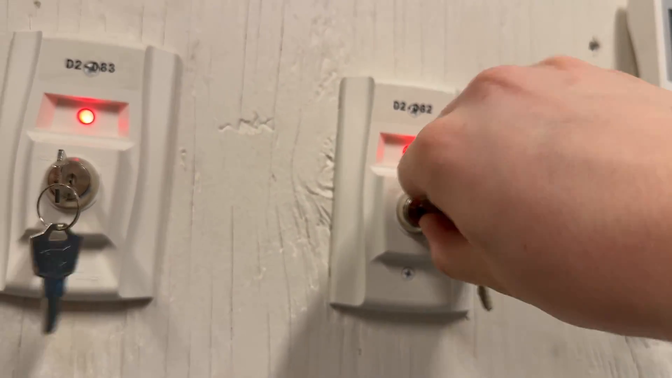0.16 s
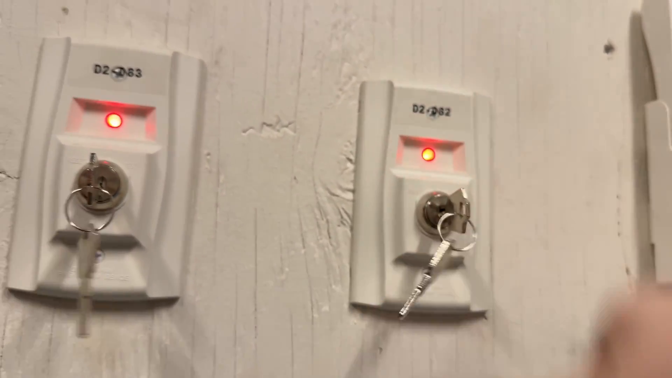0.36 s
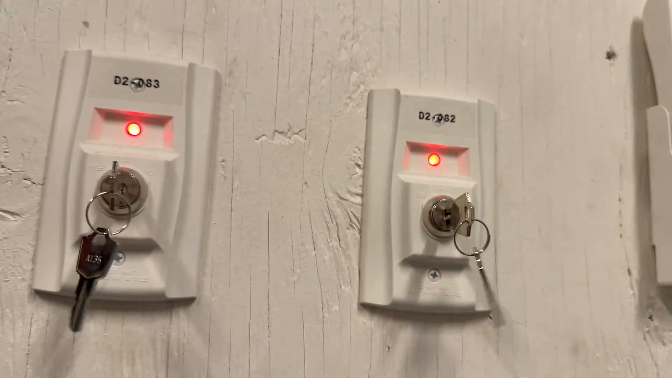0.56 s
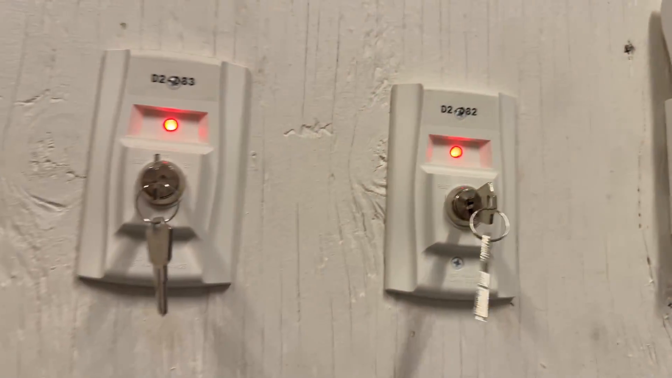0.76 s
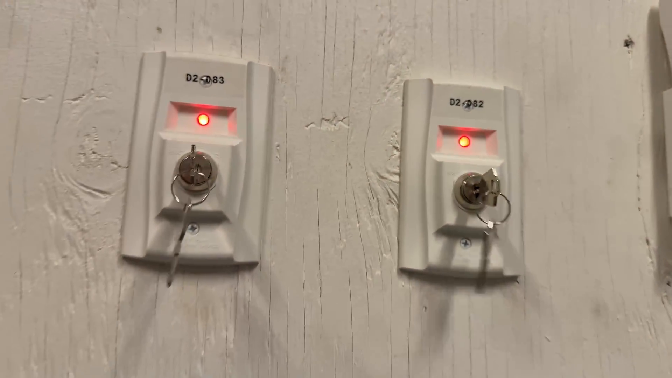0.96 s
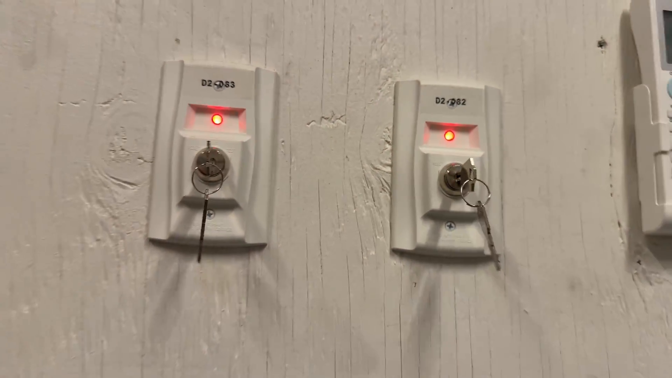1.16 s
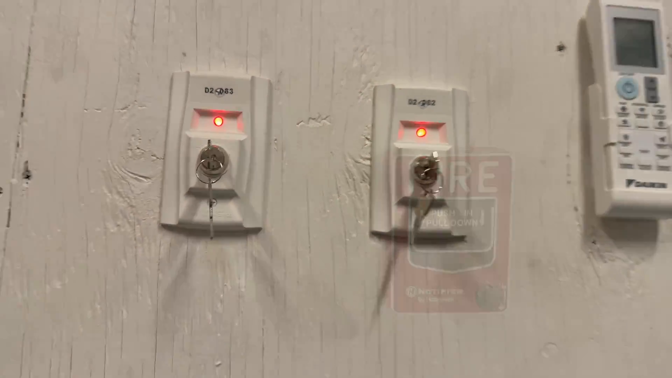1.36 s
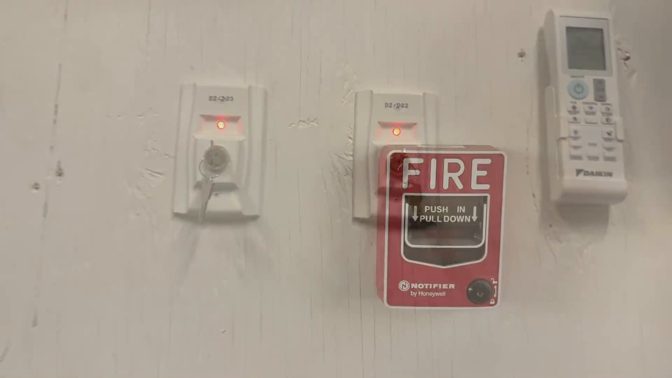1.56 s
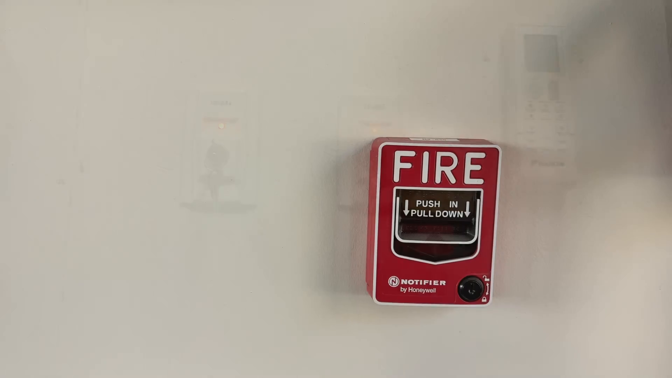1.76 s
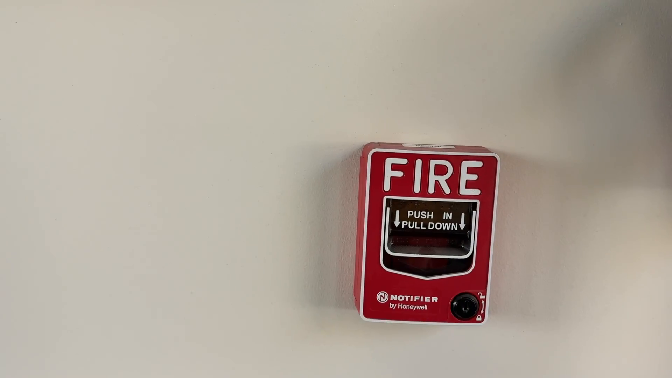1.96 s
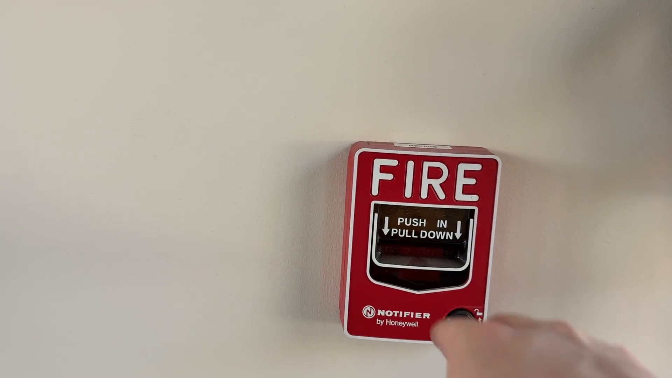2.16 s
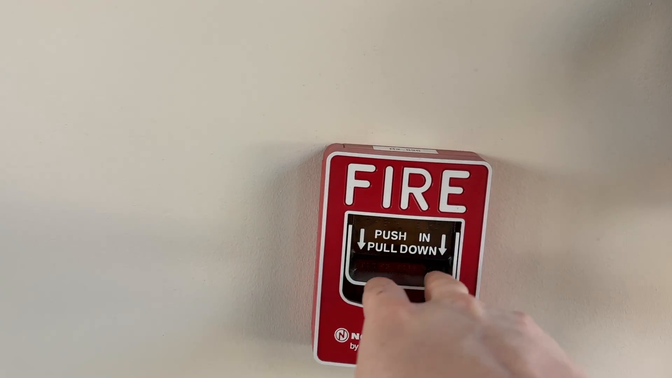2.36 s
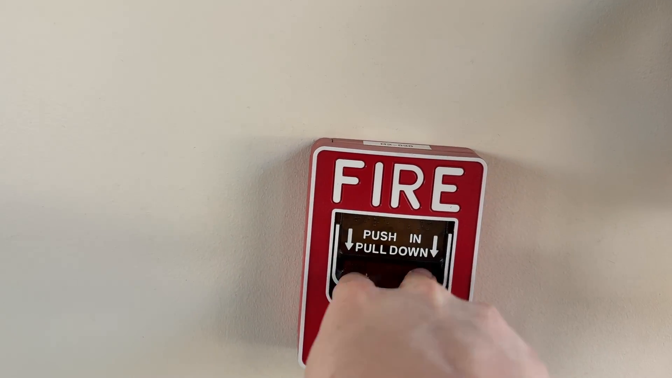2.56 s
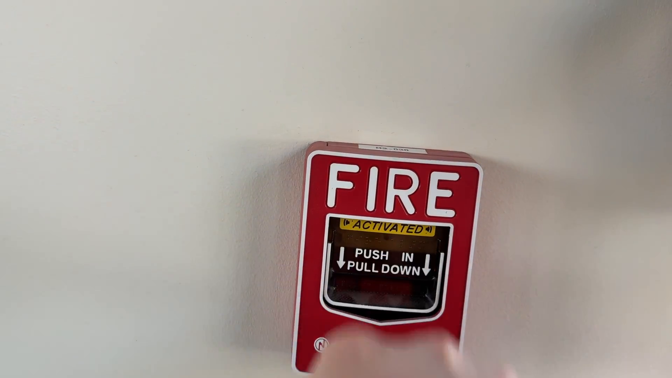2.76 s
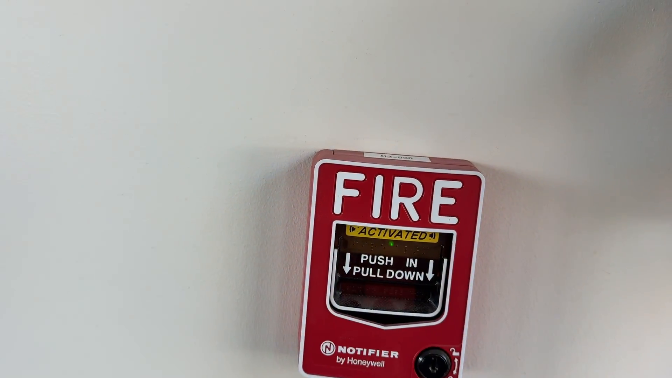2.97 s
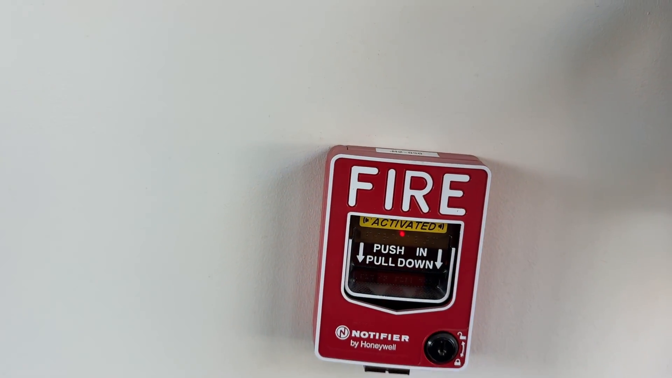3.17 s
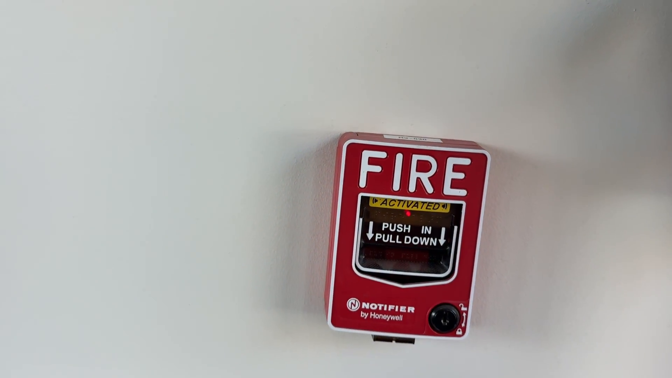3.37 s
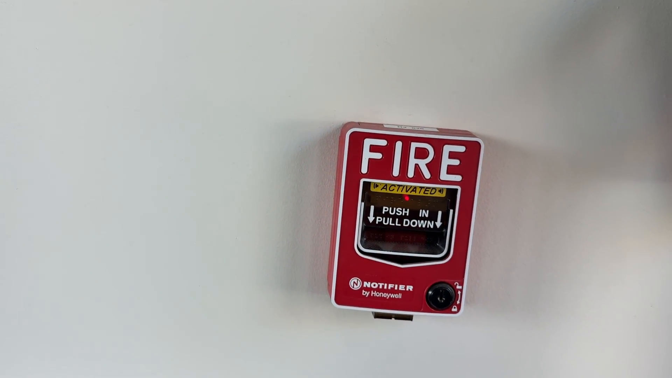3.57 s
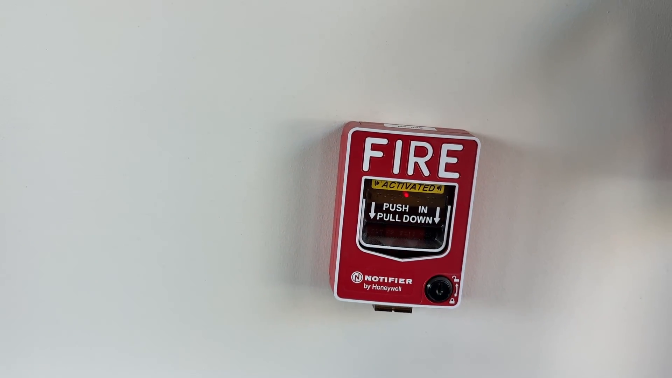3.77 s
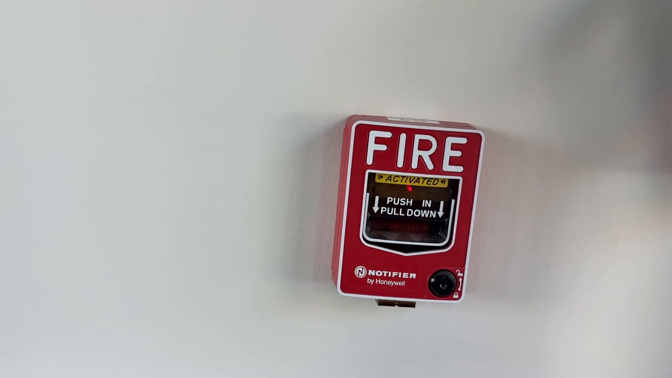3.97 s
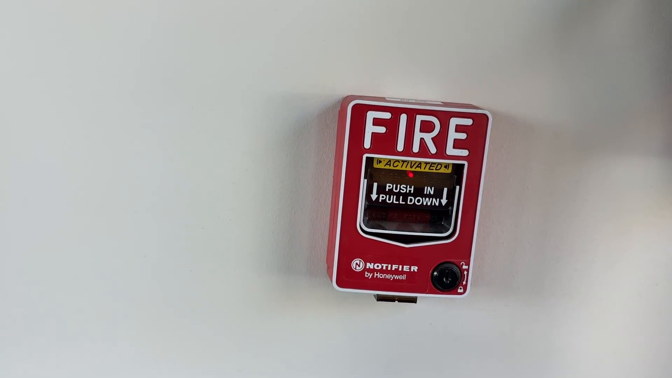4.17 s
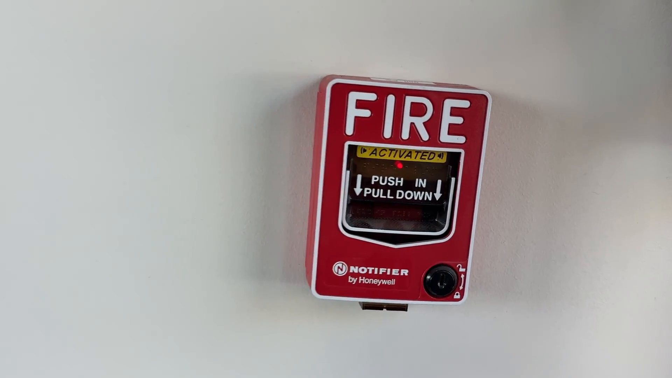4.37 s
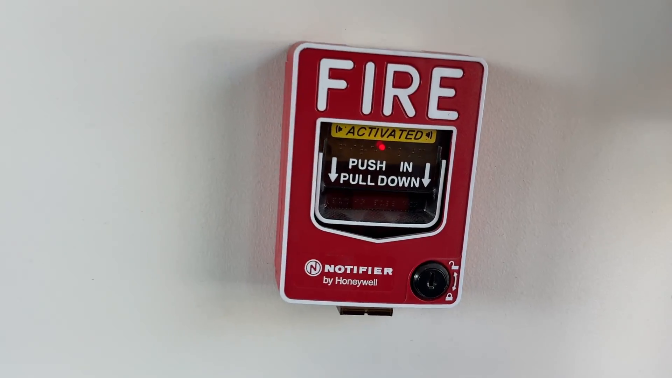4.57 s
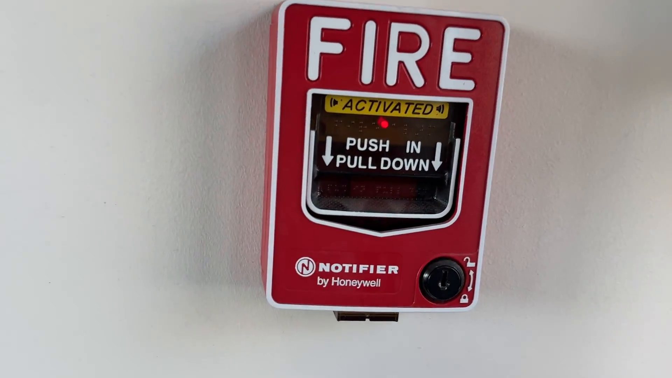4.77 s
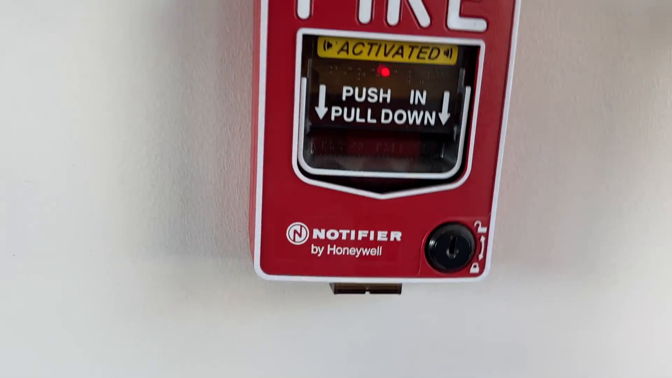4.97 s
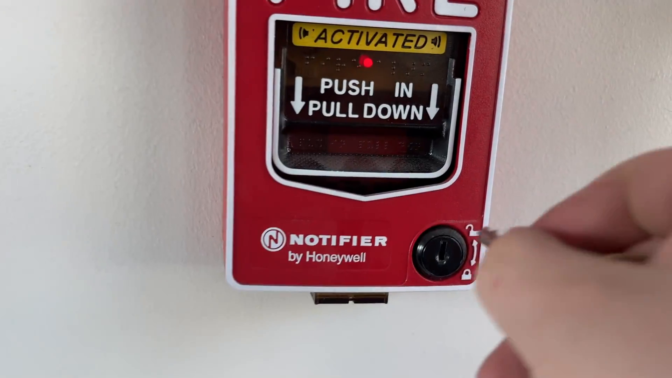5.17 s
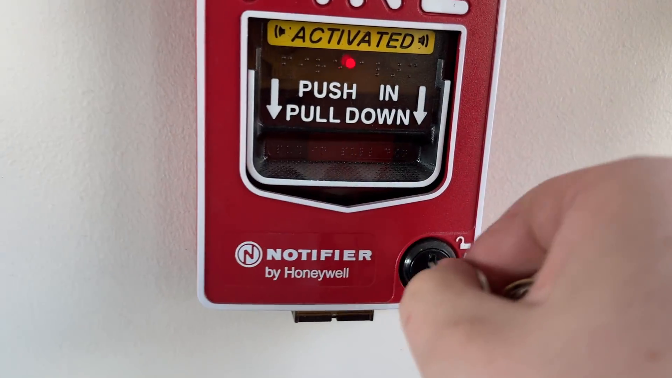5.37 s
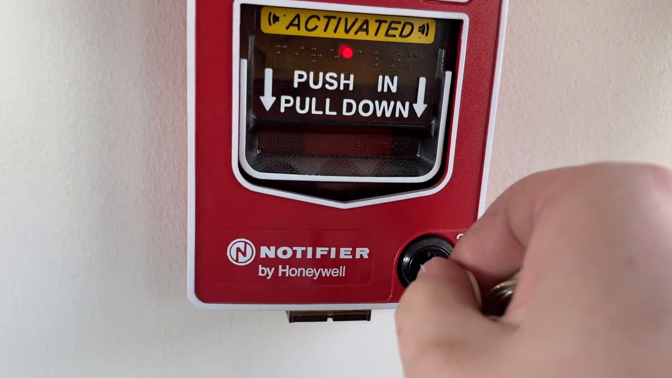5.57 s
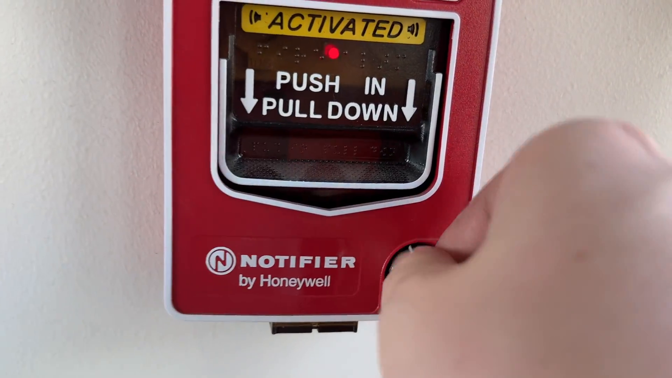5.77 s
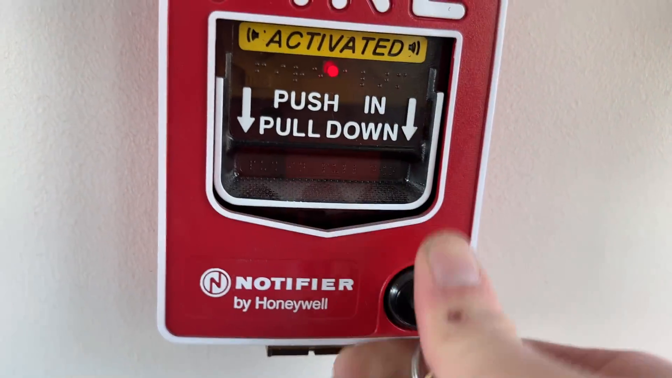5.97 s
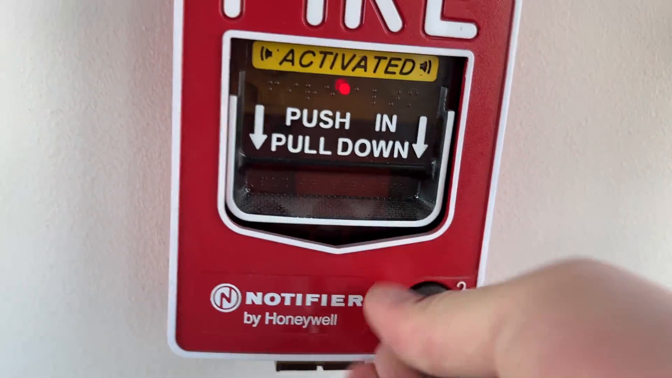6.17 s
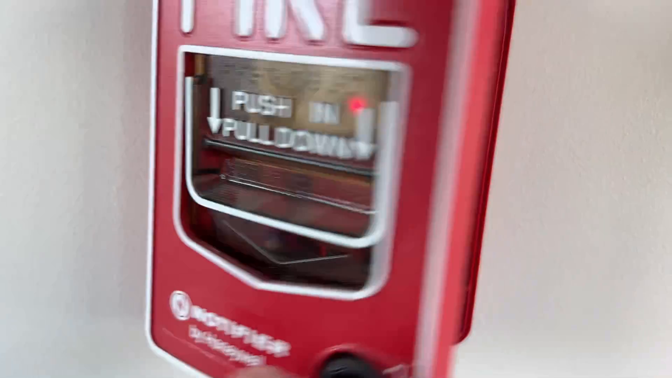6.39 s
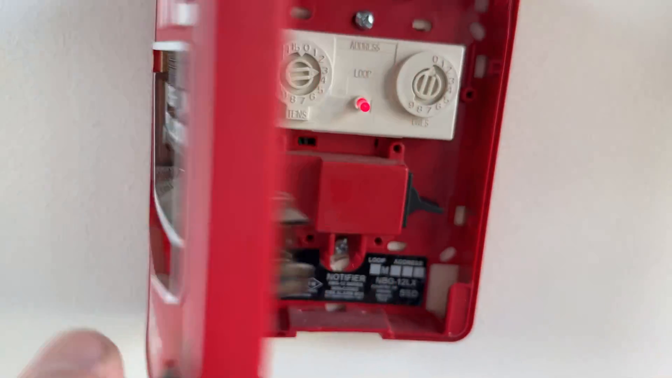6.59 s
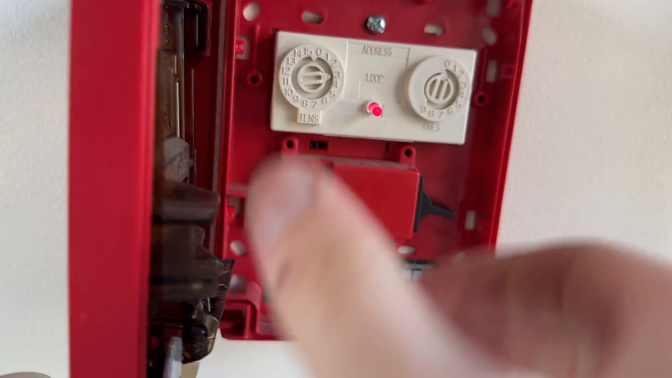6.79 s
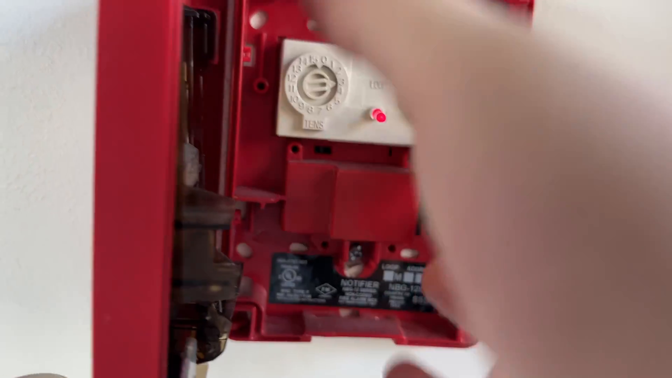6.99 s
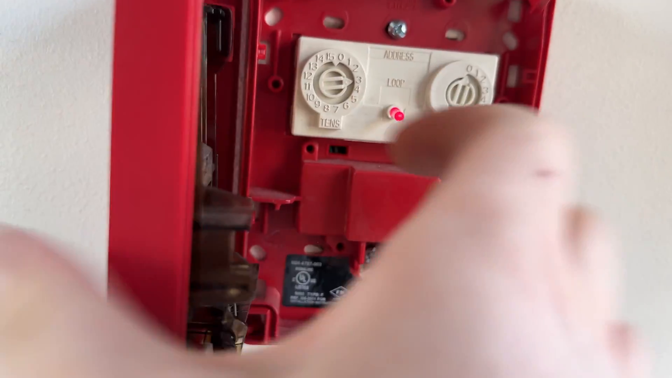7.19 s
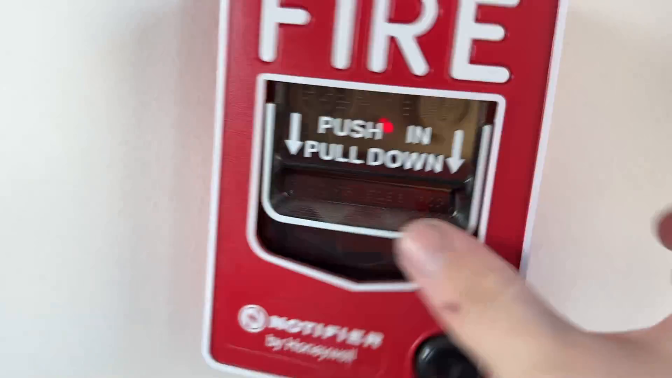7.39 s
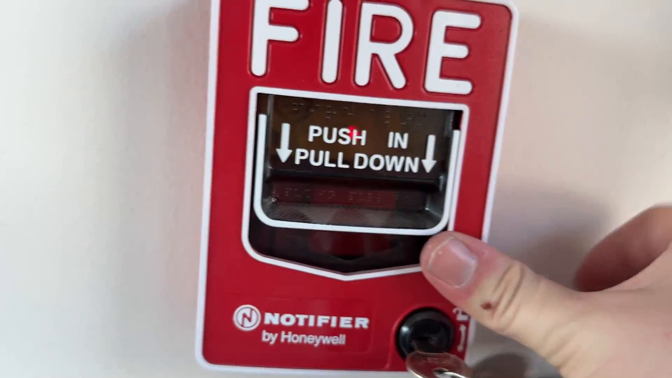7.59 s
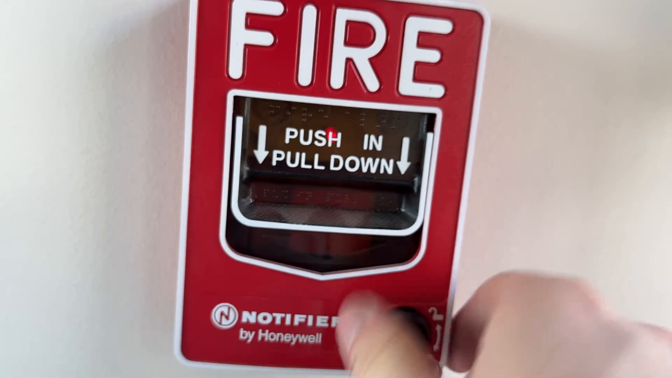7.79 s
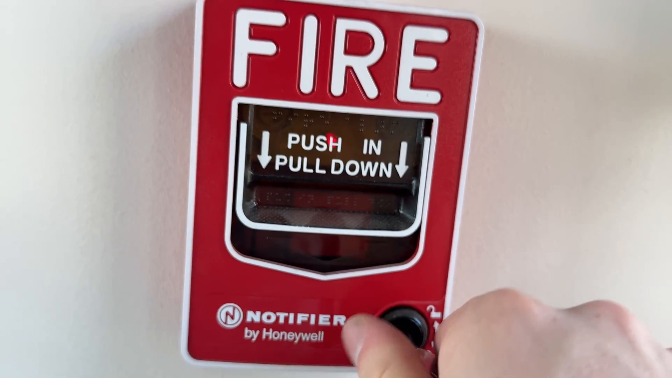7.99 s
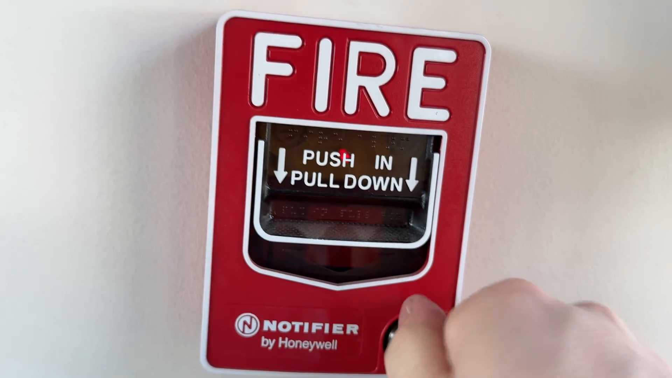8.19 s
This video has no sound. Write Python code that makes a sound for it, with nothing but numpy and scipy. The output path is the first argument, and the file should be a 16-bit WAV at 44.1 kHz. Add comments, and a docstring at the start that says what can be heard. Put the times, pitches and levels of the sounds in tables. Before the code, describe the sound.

A key clicks lightly in a wall switch in a humming room. The hum fades into a quieter, echoing hall, where an alarm box handle is pulled down with a sharp clack. A key ring jangles, the lock clicks, and the plastic box scrapes open and knocks shut again, with dull thumps from the wall behind it. The microphone is close, and a reverberant tail follows each contact.

```python
"""A key clicks round in a wall switch in a humming room. Then, in a live hall, an alarm box handle is
pulled down with a clack, a key ring jangles, and the plastic box is unlocked, swung open and shut again.
Blows crack and ring the case and thump the wall behind it; the keys tick and ring as they collide.
A two-port phone microphone is held close, with the hall's tail behind each contact."""
import sys
import numpy as np
from scipy import signal
from scipy.fft import rfft, irfft, next_fast_len
from scipy.io import wavfile
from scipy.ndimage import uniform_filter1d

SR = 44100
rng = np.random.default_rng(int(sys.argv[2]) if len(sys.argv) > 2 else 0)


def to_wav(s):
    """Save 16-bit WAV."""
    ch = np.atleast_2d(s).T  # columns
    pcm = np.round(np.clip(ch, -1, 1) * 32767)  # PCM
    wavfile.write(sys.argv[1], SR, pcm.astype(np.int16))


N = 363384
FFT = next_fast_len(N + 2 * SR)

# knocks on the plastic: (time [s], level [dB], favoured pitch [Hz], decay [ms])
PLASTIC_KNOCKS = [(0.2581, -25, 1840, 4.16), (1.911, -60.5, 2280, 35), (2.449, -36.5, 2370, 7.1),
                  (2.643, -7.5, 1560, 2), (2.649, -3, 1487, 2.37), (4.974, -9.5, 1850, 3.2),
                  (5.151, -16, 2180, 1.55), (5.179, -17, 2100, 2.5), (5.384, -24.5, 1890, 12.5),
                  (5.447, -27, 1520, 18), (5.616, -15.5, 1090, 8), (5.624, -7.5, 960, 7.2),
                  (5.676, -14, 990, 21.7), (5.708, -3, 920, 2.46), (5.826, -17, 890, 4.4),
                  (6.05, -19, 860, 10.5), (6.07, -17, 704, 5.4), (6.3, -24.5, 1290, 9.1),
                  (6.342, -10.5, 1280, 4.6), (6.357, -12, 1390, 9.2), (6.409, -5.5, 1810, 2.45),
                  (6.416, -11.5, 1630, 6.7), (7.382, -15, 1770, 7.1), (7.417, -17, 1570, 3.7),
                  (7.456, -20, 1424, 9.9), (7.477, -14.5, 1306, 11.4), (7.501, -17.5, 1394, 9.3),
                  (7.522, -23, 1330, 4.3), (8.104, -21, 1510, 3.5), (8.113, -8.5, 1410, 3.37),
                  (8.121, -14, 395, 5.5)]


def undb(db):
    """Decibels to amplitude."""
    return 10 ** (np.asarray(db) / 20)


def level(x, db):
    """Set the rms level."""
    return x * undb(db) / np.sqrt(np.mean(x ** 2))


def along(points):
    """Table values on the FFT bins, joined on a log-frequency axis."""
    hz, value = np.transpose(points)
    return np.interp(np.log(np.arange(FFT // 2 + 1) * SR / FFT + 1), np.log(hz), value)


def colour(x, points):
    """Filter by (frequency [Hz], gain [dB]) points; white noise keeps its power."""
    gain = undb(along(points))
    return irfft(rfft(x, FFT) * gain / np.sqrt(np.mean(gain ** 2)), FFT)[..., :N]


def walk(rate):
    """Glide to a new random value `rate` times a second; spread near 1."""
    step = int(SR / rate)
    return 1.2 * uniform_filter1d(np.repeat(rng.standard_normal(N // step + 1), step), step)[:N]


def grit(rate, depth_db):
    """Noise broken into uneven grains."""
    return rng.standard_normal(N) * undb(depth_db * walk(rate))


def clicks(rate, spread_db):
    """Dense chance clicks of unit power, a few stronger than the rest."""
    when, size, sign = rng.random(N) < rate / SR, rng.exponential(size=N), rng.standard_normal(N)
    return level(when * sign * undb(spread_db * size), 0)


def swells(start, hold, peak_db, rise_db_s, fall_db_s):
    """Gain that swells to each peak, holds and dies away; overlapping swells add."""
    t = np.arange(N) / SR
    rows = zip(*np.broadcast_arrays(start, hold, peak_db, rise_db_s, fall_db_s))
    return sum(undb(db - up * np.maximum(at - t, 0) - down * np.maximum(t - at - held, 0))
               for at, held, db, up, down in rows)


def bursts(rows, levels_db, rise_s, rough, blunt=False):
    """Each contact is a swelling, then fading patch of rough force; blunt makes it one tap."""
    force, t = np.zeros(N + SR), np.arange(SR // 10) / SR
    rough = np.pad(rough, (0, SR), "wrap")
    for (at, *_, decay_ms), db in zip(rows, levels_db):
        span = slice(int(at * SR), int(at * SR) + len(t))
        shape = (1 - np.exp(-t / rise_s)) ** 2 * np.exp(-t / (max(decay_ms, 1) / 1000))
        patch = 1. * (shape == shape.max()) if blunt else shape * rough[span]
        force[span] += undb(db) * patch * np.sqrt(np.sum(shape ** 2) / np.sum(patch ** 2))
    return force[:N]


def ring(force, modes, vary_db, vary_pitch):
    """Decaying modes whose strength and pitch wander as the grip shifts."""
    out = 0
    for hz, db, t60 in modes:
        turn = np.exp(2j * np.pi * np.cumsum(hz * (1 + vary_pitch * walk(12))) / SR)
        drive = force * undb(db + vary_db * walk(25))
        pole = np.exp(-np.log(1000) / (t60 * SR))
        out = out + (turn * signal.lfilter([1], [1, -pole], drive / turn)).imag
    return out


def air(spectrum, db, flicker_db):
    """Room tone, alike left and right in the bass and wide above it."""
    mid, side = (colour(rng.standard_normal(N), spectrum) for _ in range(2))
    side = colour(side, [(100, -25), (400, -6), (1000, 0)])
    pair = level(mid, db) + undb(db + 1.5) * side * np.array([[1], [-1]])
    return pair * undb(flicker_db * walk(2.6))


def background():
    """Plant noise and mains hum in the first room fade into the quieter air of the hall."""
    # room tone of each place: (frequency [Hz], relative density [dB])
    plant_spectrum = [(15, -68), (25, -42), (43, -4.5), (118, -9.5), (207, -5.5), (1030, -20), (15000, -60)]
    hall_spectrum = [(15, -23), (25, -29.5), (54, 0), (231, -23), (1000, -31), (1250, -30.5),
                     (15000, -62.5)]
    # hum tones: (frequency [Hz], rms level [dB])
    hum_tones = [(119.5, -52.5), (1024, -65.5)]
    t = np.arange(N) / SR
    in_hall = np.interp(t, (1.36, 1.83), (0, 1))
    hum = sum(undb(db + 2 * walk(6)) * np.sqrt(2) * np.sin(2 * np.pi * hz * t) for hz, db in hum_tones)
    room = air(plant_spectrum, db=-49, flicker_db=0.43) + hum
    return (1 - in_hall) * room + in_hall * air(hall_spectrum, db=-51, flicker_db=0.34)


def hall(x):
    """Diffuse tail of the hall, each half-octave band dying at its own rate."""
    # reverberation time: (frequency [Hz], t60 [s])
    decay_times = [(60, 1.6), (1900, 1.267), (3000, 0.91), (6000, 0.92), (16000, 0.1)]
    # tone of the tail: (frequency [Hz], relative gain [dB])
    tail_tone = [(60, 3.5), (330, 10.5), (700, 5.5), (1800, 5), (2600, 0.5), (16000, -4)]
    # width of the tail at the microphone: (frequency [Hz], side over mid [ratio])
    width = [(80, .03), (150, .2), (300, .6), (1000, 1.4), (5000, 1.4), (9000, .3)]
    decay_hz, decay_s = np.transpose(decay_times)
    t, tail = np.arange(2 * SR) / SR, 0
    octaves = np.log2(np.arange(FFT // 2 + 1) * SR / FFT + 1)
    for hz in 45 * 2 ** np.arange(0, 9, .5):
        t60 = np.interp(np.log(hz), np.log(decay_hz), decay_s)
        envelope = np.exp(-np.log(1000) * t / t60) * np.minimum(t / 0.007, 1)
        mid, side = rfft(rng.standard_normal((2, len(t))) * envelope, FFT)
        pair = mid + along(width) * side * np.array([[1], [-1]])
        band = np.sqrt(np.clip(1 - 2 * abs(octaves - np.log2(hz)), 0, 1))
        tail = tail + pair * band
    return irfft(rfft(x, FFT) * tail * undb(along(tail_tone) - 35), FFT)[:, :N]


def rasp_and_push():
    """Two gain curves: rough swells of sound rising after the knocks, and the hand's push on the wall."""
    # swells: (time at full strength [s], hold [s], rasp [dB], push [dB])
    peaks = [(2.663, 0.031, -43, -38), (5.44, 0.022, -51, -33.5), (5.673, 0.022, -40, -26),
             (5.708, 0.031, -52, -23), (6.059, 0.014, -38.5, -32), (6.37, .02, -37.5, -35),
             (6.586, 0.059, -31, -41), (7.516, 0.21, -31.5, -37.5), (7.902, 0.32, -47, -52)]
    at, hold, rasp_db, push_db = np.transpose(peaks)
    rasp = swells(at, hold, rasp_db, rise_db_s=131, fall_db_s=102)
    push = swells(at, hold, push_db, rise_db_s=153, fall_db_s=94)
    resting = swells([5.22], hold=3.1, peak_db=-47, rise_db_s=153, fall_db_s=94)
    return rasp, push + resting


def wall_load_db():
    """Knock levels for box and wall: light, high-pitched knocks move them less."""
    _, db, hz, _ = np.transpose(PLASTIC_KNOCKS)
    return db - 16 * np.maximum(np.log2(hz / 1500), 0)


def wall():
    """Knocks and the pushing hand shake the hollow wall behind the box."""
    # wall modes: (frequency [Hz], level [dB], t60 [s])
    modes = [(70.6, -6.5, 0.35), (100.6, 8.5, 0.1), (142.2, -0.5, 0.29)]
    knocks = bursts(PLASTIC_KNOCKS, wall_load_db() - 12.5, rise_s=0.0026, rough=grit(120, 1.4))
    _, pushing = rasp_and_push()
    push = undb(4.5) * pushing * rng.standard_normal(N)
    thump = undb(-41.5) * ring(knocks + push, modes, vary_db=2, vary_pitch=0.033)
    return colour(thump, [(35, -38), (55, -6), (300, -3.5), (600, -7)])


def shaking():
    """How hard the key ring moves: a gain curve."""
    # shakes of the ring: (time at full strength [s], time to swell 30 dB [s], hold [s], level [dB])
    shakes = [(1.307, 0.24, 0.0085, -52), (1.939, 0.57, 0.0045, -68.5), (2.461, 0.09, 0.021, -48.5),
              (3.66, 0.02, 0.26, -46.5), (3.829, 0.03, 0.16, -37), (4.55, 0.3, 0.012, -41.5),
              (4.837, 0.06, 0.023, -27), (4.925, 0.08, 0.062, -27), (5.987, 0.15, 0.013, -33),
              (6.66, 0.39, 0.0088, -29.5), (7.547, 0.5, 0.21, -48)]
    # keys dangling as they are carried: (time [s], hold [s], level [dB])
    dangles = [(4.05, 0.57, -57), (5.57, 0.54, -52.5), (6.093, 0.25, -49), (7.917, 0.23, -44)]
    at, swell_s, hold, db = np.transpose(shakes)
    slope_db_s = 177.5
    shaken = swells(at, hold, db, 30 / swell_s, slope_db_s)
    return shaken + swells(*np.transpose(dangles), slope_db_s, slope_db_s)


def keys(blunt):
    """Clinks and a blur of small scrapes tick and ring the keys, each clink with its own brightness."""
    # key clinks: (time [s], level [dB], extra gain below split_hz [dB], decay [ms])
    clinks = [(0.2598, -34.5, 1, 8), (1.692, -50, 2, 1.4), (2.492, -25, 1, 3.2), (2.515, -37, 2, 2.7),
              (3.705, -37, -1, 6), (4.2105, -32, 2.5, 8.9), (4.34, -31, 0, 6.4), (4.408, -28.5, 4.5, 3),
              (4.583, -13.5, -2, 3.2), (4.666, -27, 1, 9), (4.811, -26.5, -5, 2), (4.832, -15, 1, 10),
              (4.863, -20, -7.5, 10), (4.902, -14, -10.5, 18), (4.968, -11.5, 3, 3), (4.998, -5.5, -6, 5.6),
              (5.0398, -13, 2, 4.4), (5.149, -19, 0, 1.3), (5.17, -10.5, 1, 1.75), (5.573, -29, -6, 2.2),
              (5.96, -14, -7, 7), (5.991, -17, -10.5, 5.2), (6.03, -19, -4, 6), (6.144, -22, -0.5, 8.1),
              (6.2446, -20, -1, 4), (6.4059, -4.5, 3, 1.3), (6.736, -26.5, -1, 3.5),
              (6.8131, -13.5, 0.5, 5), (6.911, -31, -6, 4.4), (6.988, -11.5, 4, 2.7), (7.012, -33, 8, 2.1),
              (7.067, -23.5, 4, 2.3), (7.078, -19.5, 3, 3), (7.132, -27, -4, 2.3), (7.353, -28.5, -1, 5.3),
              (7.5225, -1.5, -0.5, 2.2), (7.614, -13, 3, 2.5), (7.766, -8, -3.5, 5.6), (7.897, -20, 1, 4.1),
              (7.995, -23, 6, 1.7), (8.053, -9.5, -10.5, 2.5), (8.114, -17.5, -2, 4.4)]
    # key modes: (frequency [Hz], level [dB], t60 [s])
    modes = [(4880, -14, 0.008), (7300, -18, 0.035), (10820, -2.5, 0.019), (11050, -8, 0.065),
             (13620, -10.5, .07), (15000, -15.5, .03), (15420, -16, 0.025)]
    # tick of metal on metal: (frequency [Hz], relative density [dB])
    tick_spectrum = [(800, -29.5), (2200, 3), (7000, 2.5), (8500, 11.5), (11000, 4.5), (13000, 18),
                     (16000, -10)]
    split_hz, scrape_s = 8000, 0.003
    scrapes = signal.lfilter([1], [1, -np.exp(-1 / (scrape_s * SR))], clicks(900, 2) ** 2)
    jangle = shaking() * level(np.sqrt(scrapes) * grit(60, 2.8), -0.5)
    _, clink_db, low_db, _ = np.transpose(clinks)
    rough, out = grit(400, 5.5), 0
    for band, extra_db, jangle_db in (("low", low_db, -1), ("high", 0, 0)):
        force = bursts(clinks, clink_db + extra_db, 0.0006, rough, blunt) + undb(jangle_db) * jangle
        tick = undb(-1.5) * colour(force, tick_spectrum)
        rings = undb(-24) * ring(force, modes, vary_db=5.5, vary_pitch=0.0053)
        out = out + signal.sosfilt(signal.butter(4, split_hz, band, fs=SR, output="sos"), tick + rings)
    return out


def case(blunt):
    """Knocks crack the plastic and ring the modes near their pitch most; a rasp swells after some."""
    # case modes: (frequency [Hz], level [dB], t60 [s])
    modes = [(372.5, -6, 0.064), (920, -2, 0.04), (1213, -2.5, 0.035), (1356, 6.5, 0.012),
             (1536, 1.5, 0.019), (1914, -1.5, 0.019), (2325, 2, .016)]
    # dull crack and bright edge of a knock: (frequency [Hz], relative density [dB])
    crack_spectrum = [(220, -19), (500, -8.5), (1300, 10.5), (2500, 8.5), (5000, -6)]
    edge_spectrum = [(700, -27), (2000, -3), (3500, -4), (7000, -8.5), (16000, -12.5)]
    _, knock_db, knock_hz, _ = np.transpose(PLASTIC_KNOCKS)
    rough = grit(300, 3.4)
    rasp_gain, _ = rasp_and_push()
    rasp = rasp_gain * clicks(4000, 1.2) * undb(2 * walk(60))
    dull_force = bursts(PLASTIC_KNOCKS, wall_load_db(), 0.001982, rough, blunt)
    crack = colour(dull_force + rasp, crack_spectrum)
    edge_db = knock_db - 3 + 14 * np.log2(knock_hz / 1500)  # higher knocks are brighter
    sharp_force = bursts(PLASTIC_KNOCKS, edge_db, 0.00043, grit(500, 2.84), blunt)
    edge = colour(sharp_force + undb(-6) * rasp, edge_spectrum)
    rings = 0
    for mode in modes:
        octaves_off = abs(np.log2(mode[0] / knock_hz))
        force = bursts(PLASTIC_KNOCKS, knock_db - 24 * octaves_off, 0.002012, rough, blunt)
        rings = rings + ring(force + undb(-13) * rasp, [mode], vary_db=4.5, vary_pitch=0.044)
    return undb(-5) * crack + undb(-1.5) * edge, undb(-20.5) * rings


def ports(x):
    """The phone's body shades its two microphone ports differently and turns their phase apart."""
    # shading: (frequency [Hz], left minus right [dB])
    shading = [(200, -.3), (800, -5), (2400, -4), (4400, -6), (8100, 0)]
    # phase between the ports: (frequency [Hz], left ahead of right [rad])
    lead = [(150, 0), (950, -.9), (2500, -1.5), (4000, 0), (7400, .3), (8100, 3), (9500, 3.4), (10400, 6),
            (11700, 6.6), (12800, 9.3), (14200, 9.9), (14900, 12.4)]
    half = undb(along(shading) / 2) * np.exp(.5j * along(lead))
    return irfft(rfft(x, FFT) * np.array([half, 1 / half]), FFT)[:, :N]


def scene():
    """Box, keys and wall close to the microphone, the hall's tail and room tone behind them."""
    # feed to the tail, moderate at first, highest for the clack, lowest after: (time [s], level [dB])
    send_levels = [(1.5, -7.5), (2.601, -5), (2.7, 6), (2.8, -12)]
    send = undb(np.interp(np.arange(N) / SR, *np.transpose(send_levels)))
    crack, rings = case(blunt=False)
    metal, thump = keys(blunt=False), wall()
    # the hall is fed clean taps and little ringing, so its tail sounds smooth
    tap_crack, tap_rings = case(blunt=True)
    feed = tap_crack + undb(-8) * tap_rings + undb(4.5) * keys(blunt=True) + undb(-5.5) * thump
    return ports(crack + rings + metal + thump + hall(send * feed)) + background()


def record(dry):
    """The phone rounds the loudest peaks, drops the deepest bass and cuts the top."""
    bottom_hz, top_hz = 38, 16000
    rounded = np.tanh(1.234 * dry) / 0.98
    thinned = signal.sosfilt(signal.butter(2, bottom_hz, "high", fs=SR, output="sos"), rounded)
    return signal.sosfilt(signal.ellip(8, .2, 70, top_hz, fs=SR, output="sos"), thinned)


dry = scene()
out = record(dry)
to_wav(out)
```